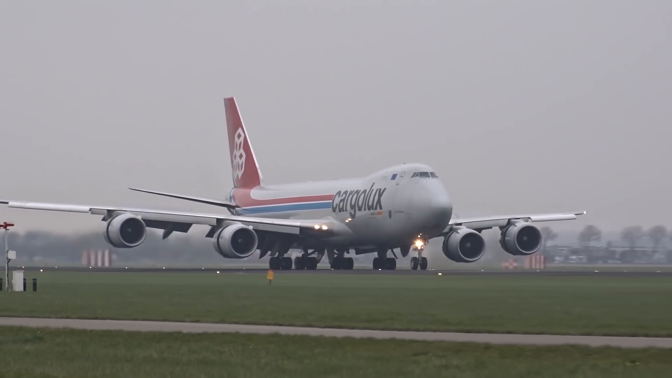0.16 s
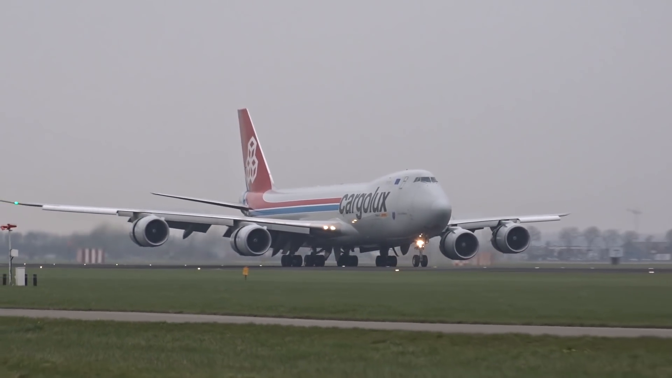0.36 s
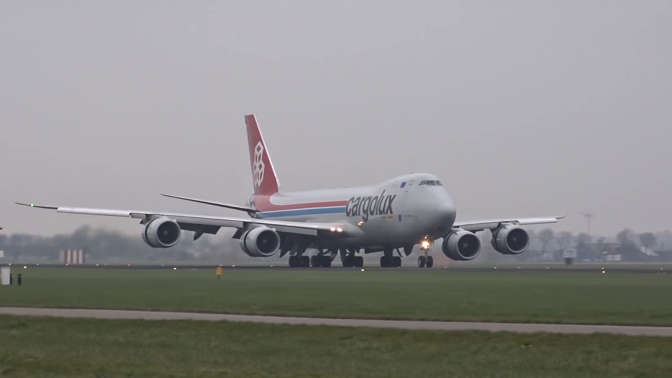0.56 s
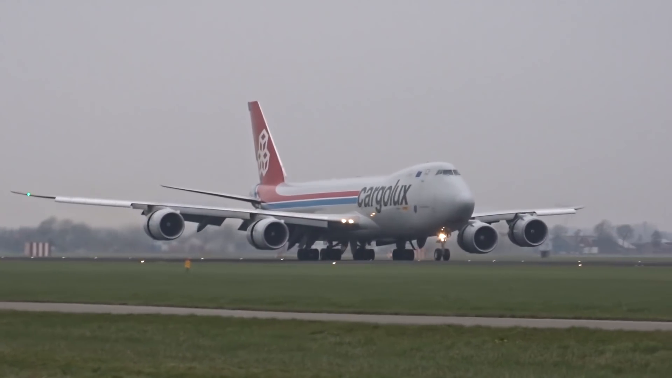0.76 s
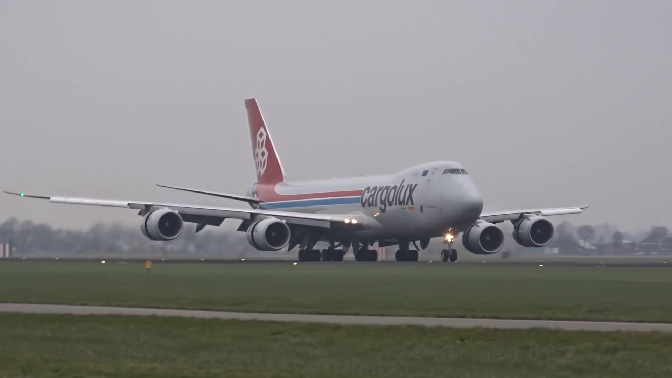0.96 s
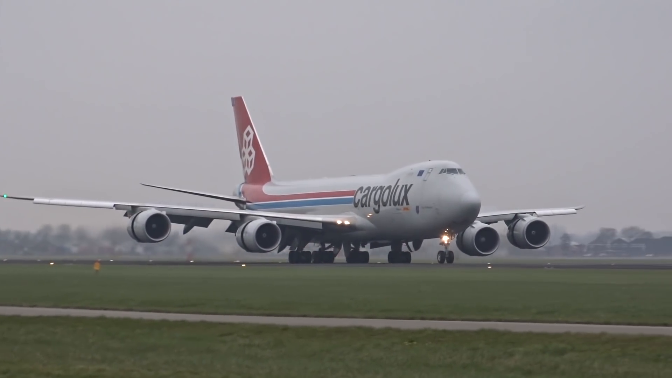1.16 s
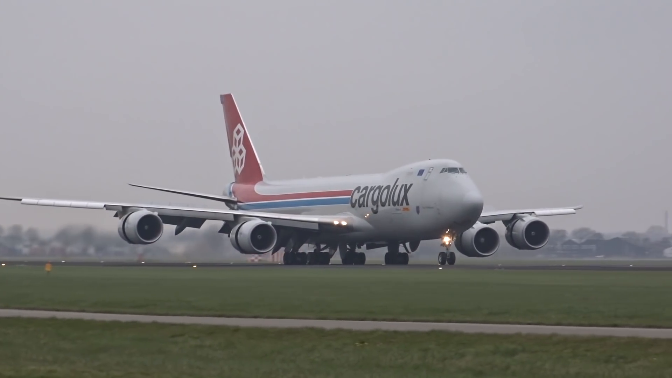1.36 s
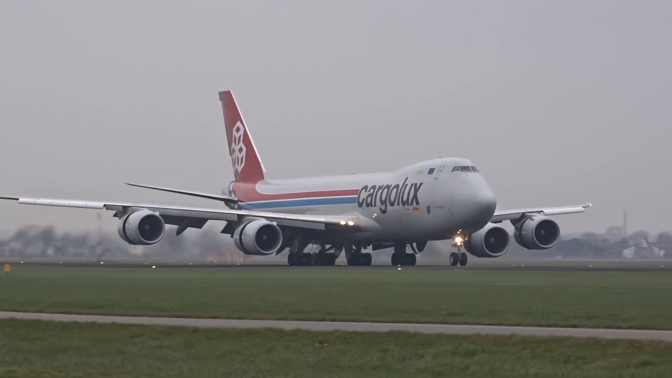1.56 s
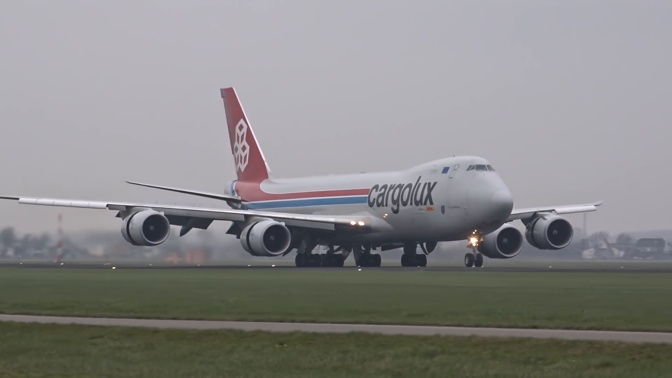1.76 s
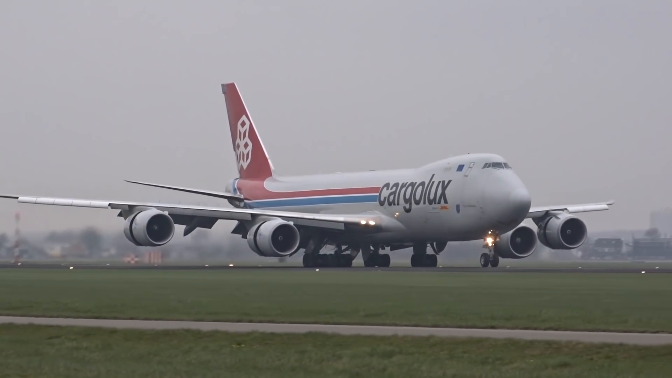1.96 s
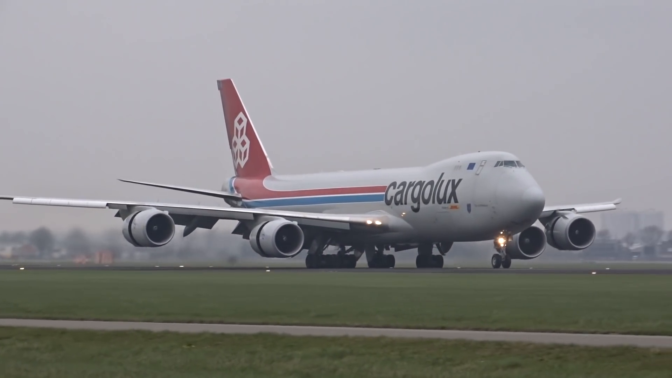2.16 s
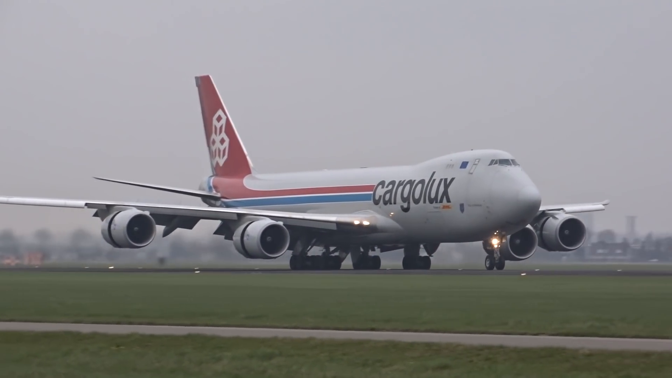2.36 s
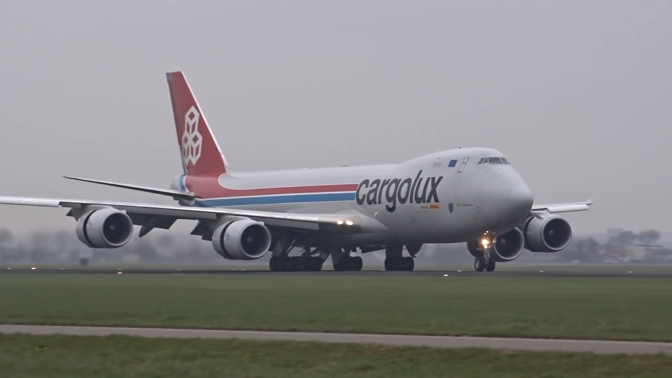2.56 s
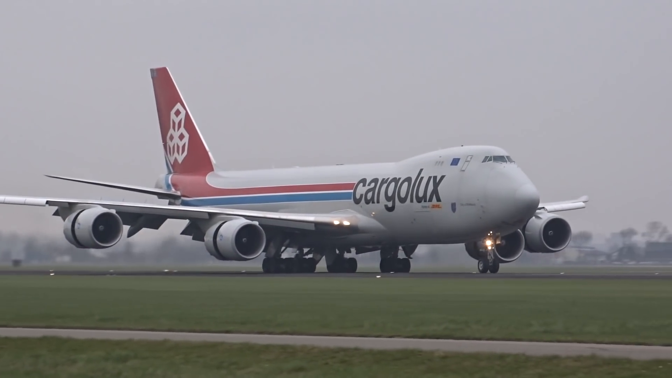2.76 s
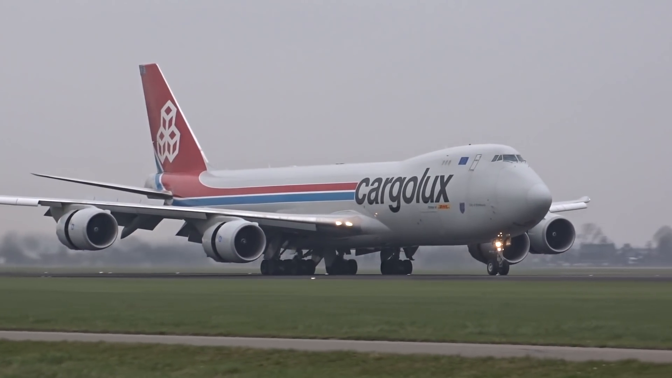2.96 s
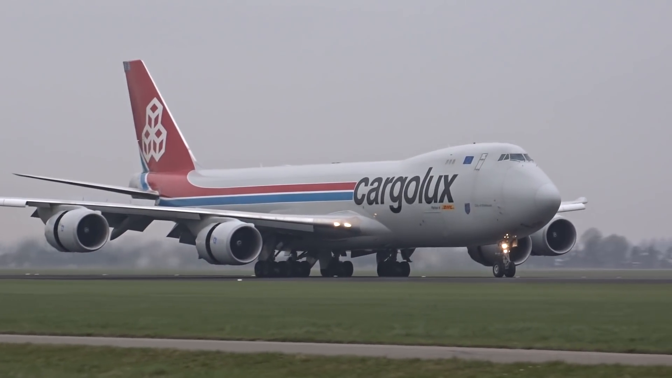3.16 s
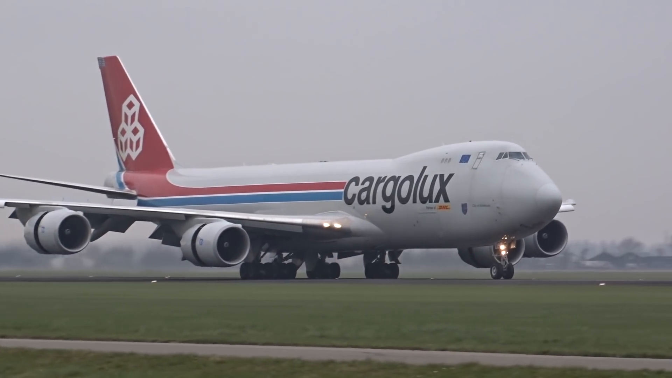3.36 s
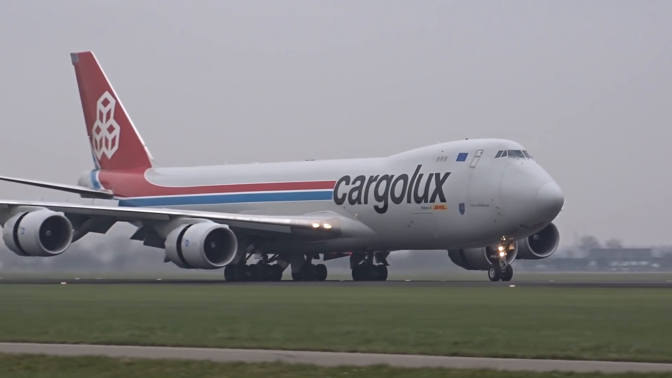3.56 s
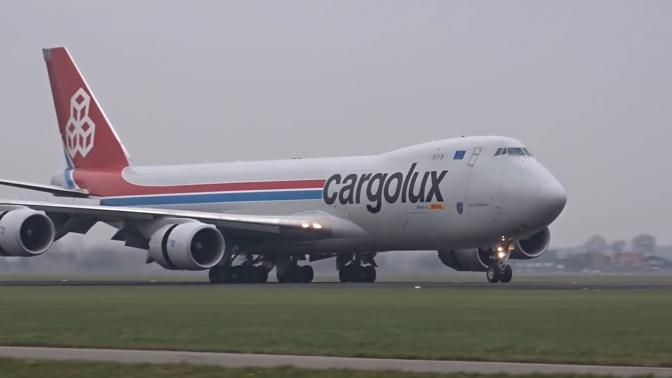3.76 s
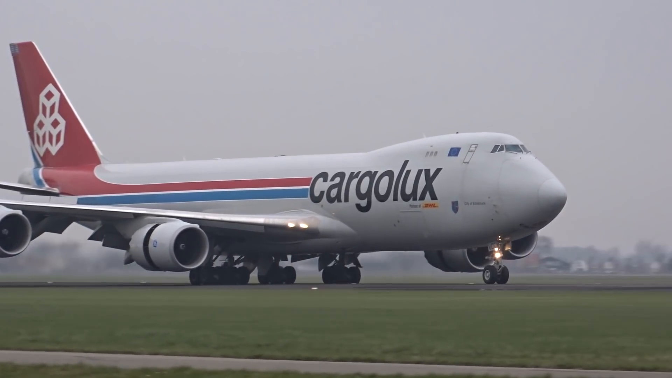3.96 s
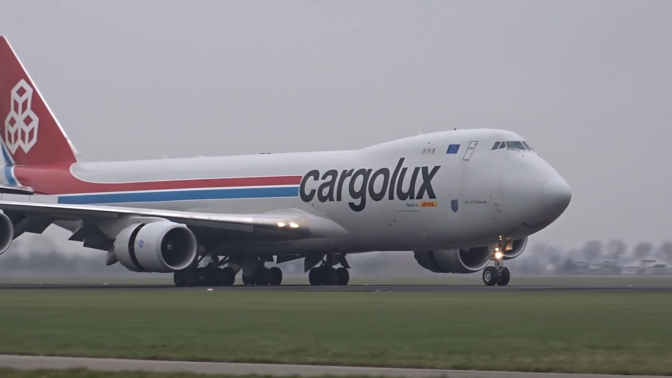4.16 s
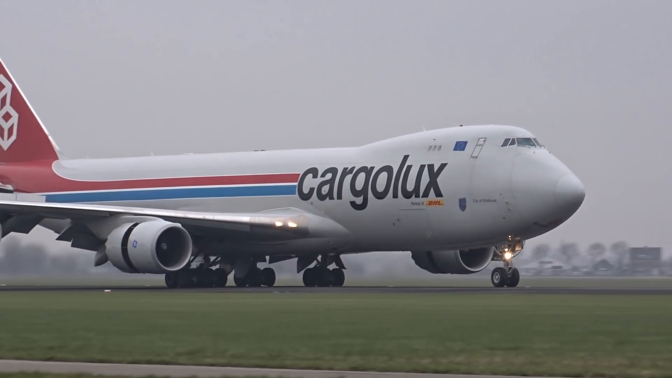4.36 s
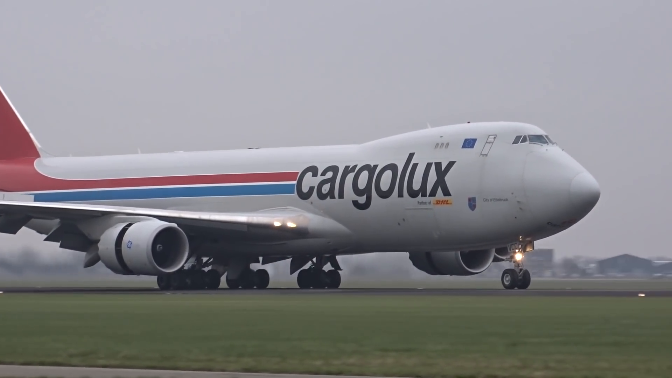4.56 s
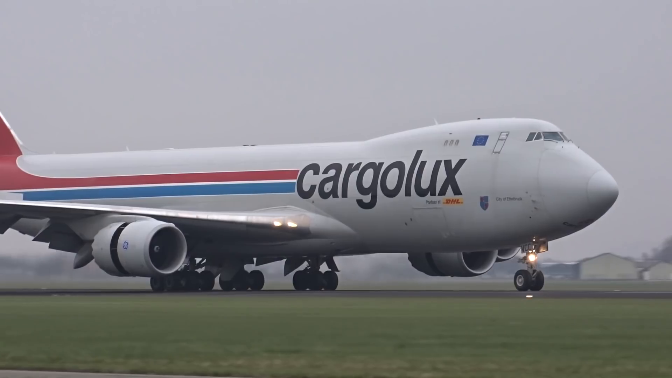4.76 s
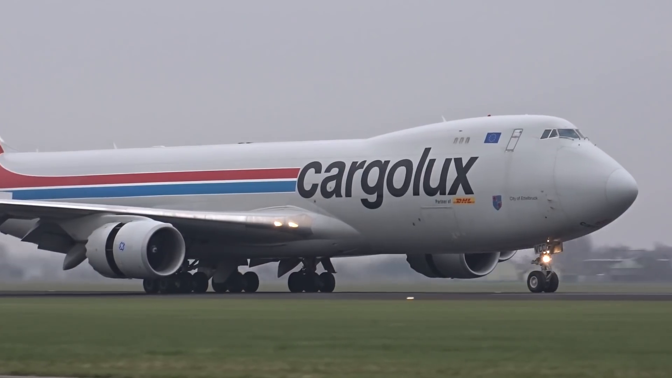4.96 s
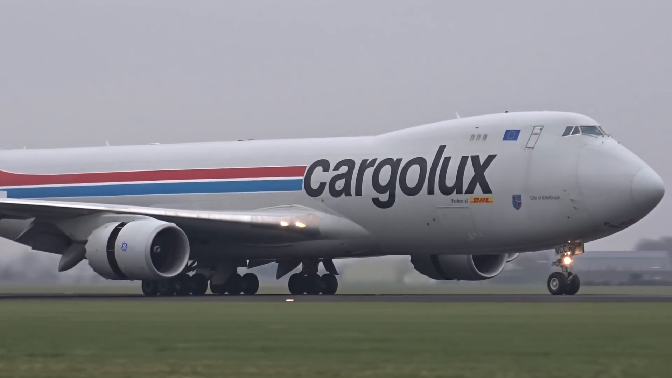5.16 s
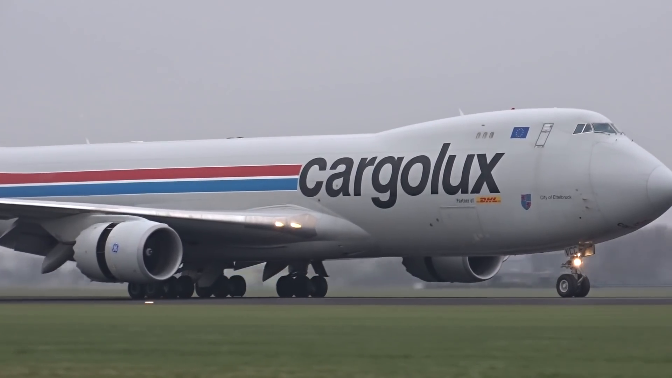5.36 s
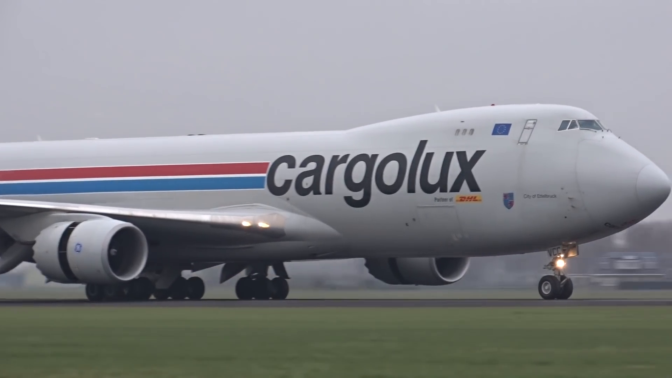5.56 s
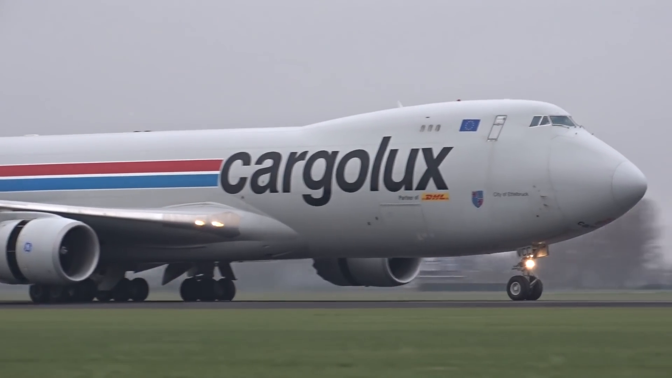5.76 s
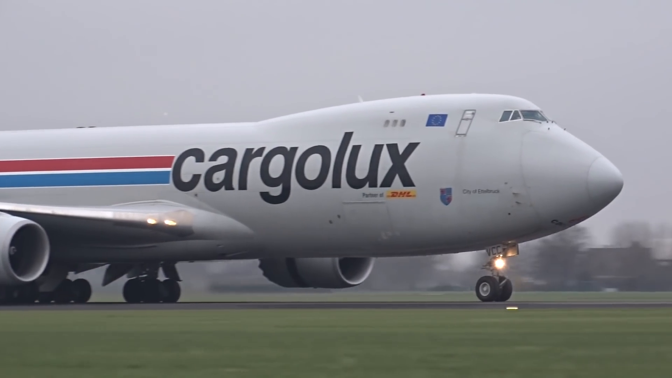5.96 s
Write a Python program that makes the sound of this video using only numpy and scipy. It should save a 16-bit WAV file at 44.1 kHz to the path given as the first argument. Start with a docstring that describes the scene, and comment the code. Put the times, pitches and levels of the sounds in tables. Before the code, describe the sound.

Jet engines rumble on a runway, build to a loud reverse-thrust roar with a faint fan tone, and hold as the airliner passes.

```python
"""A grass field beside a runway, a camera's stereo microphone, a four-engine jet some 450 m up the strip.
At first the zoom motor whirs faintly by the microphone and the housing ticks. The jet rolls closer,
braking, and opens its thrust reversers: the rumble rises, then the roar swells around a thin fan tone.
The ground lifts the rumble and hollows the low mids; the roar brightens as less air lies between.
The housing ticks once more, and the fan tone fades as the aircraft turns side-on."""
import sys
import numpy as np
from scipy import signal
from scipy.io import wavfile
from scipy.ndimage import uniform_filter1d, minimum_filter1d

SR = 44100
rng = np.random.default_rng(int(sys.argv[2]) if len(sys.argv) > 2 else 0)


def master(y):
    """Save y as 16-bit WAV."""
    cut = np.clip(np.atleast_2d(y).T, -1, 1)
    pcm = np.round(cut * 32767)  # scale
    wavfile.write(sys.argv[1], SR, pcm.astype(np.int16))


N = 265041
FRAME, HOP = 2048, 512
# noise is shaped on a grid of pitch (rows) and time (columns)
HZ, T = np.fft.rfftfreq(FRAME, 1 / SR)[:, None], np.arange(N // HOP + 5) * HOP / SR

# the fans spool up, hold, and seem to sag as the aircraft turns side-on: time_s, pitch_hz
FAN_SPOOL = [(0, 438.7), (.7, 473), (1.1, 596), (1.55, 696), (1.9, 761), (2.25, 813), (2.6, 836),
             (3.4, 847), (4.3, 825), (6.01, 813)]


def roar(gust_db=1.1, patch_db=0.26, side_on_s=4.35):
    """Spectrum in dB of the reversed jets, dulled by the air and shaken by its eddies."""
    # roar at the nearest point: pitch_hz, relative_db
    colour = [(150, -27.5), (260, -4), (286, -9.5), (370, -7), (544, -5.5), (598, -5.5), (825, -4),
              (879, -4.5), (1450, -4), (3170, -6), (3610, -10), (6320, -19), (8430, -32.5), (12000, -70),
              (15600, -89), (22000, -120)]
    # duct resonances: pitch_hz, width_hz, height_db, db_per_fan_speed_db, side_on_loss_db
    ducts = [(815, 300, 3.6, .0, 2.5), (1900, 197, 3, 1.0, .5)]
    # brief swells, most in the treble: centre_s, treble_gain_db, half_length_s
    surges = [(2.684, 0.5, 0.056), (2.978, 0.5, .08), (4.14, 3.5, 0.052), (4.679, 4, 0.028),
              (5.137, 1, 0.043), (5.777, 2.5, 0.049)]
    air_loss_db = 0.0732 * air_path(T) * (HZ / 6000) ** 1.8  # 0.0732 dB a metre at 6 kHz
    db = engine_level(T, full_db=-26.5, per_speed=3.6, per_100m=-0.65) + shape(colour, HZ, 450, 1180)
    db = db - air_loss_db
    side_on = np.clip((T - side_on_s) / 0.5, 0, 1)  # the intakes stop facing the microphone
    for hz, width, height_db, per_speed, loss_db in ducts:
        db = db + (height_db + per_speed * fan_speed_db(T) - loss_db * side_on) * bell(HZ, hz, width)
    surge_db = sum(gain_db * bell(T, centre, half) for centre, gain_db, half in surges)
    # eddies along the path make short waves flicker most, in broad bands and in patches
    flicker_db = gust_db * blotches(bins=240, frames=2) + patch_db * blotches(bins=24, frames=4)
    treble_weight = np.clip(HZ / 5000, 0, 1) ** 0.33
    return db + treble_weight * (surge_db + flicker_db)


def rumble(early_s=0.43):
    """Spectrum in dB of the deep exhaust rumble, which rises ahead of the fans."""
    # exhaust rumble, lifted by the ground: pitch_hz, relative_db
    colour = [(5, -50), (16, -8), (30, -1), (50, 1), (80, 25.5), (110, -5.5), (160, -14), (300, -58.5),
              (600, -120)]
    return engine_level(T + early_s, full_db=-30, per_speed=2.0, per_100m=-0.9) + shape(colour, HZ)


def drone():
    """Spectrum in dB of the engines' low drone, which grows as they near the microphone."""
    # engine drone: pitch_hz, relative_db
    colour = [(30, -80.5), (60, -6.5), (95, -8), (125, 0.5), (155, -0.5), (190, -3.5), (235, -10),
              (280, -23.5), (400, -22), (550, -73.5), (1000, -120)]
    return engine_level(T, full_db=-12.5, per_speed=1.92, per_100m=3.0) + shape(colour, HZ)


def fans(level_db=-35.5, start_s=0.93, stop_s=5.8, waver_db=2.0, waver_hz=2.83):
    """The thin tone of the fans, which the air makes waver in level and pitch."""
    t = np.arange(N) / SR
    hz = fan_hz(t)
    eddies = uniform_filter1d(rng.standard_normal((len(T), 2)), size=9, axis=0).T
    swell, bend = (np.interp(t, T, unit_rms(eddy)) for eddy in eddies)
    phase = 2 * np.pi * np.cumsum(hz + waver_hz * bend) / SR
    lead, _ = microphone_ports(hz, t)
    fade = np.clip((t - start_s) / 1.6, 0, 1) * np.clip((stop_s - t) / 1.9, 0, 1)
    return np.sqrt(2) * fade * amp(level_db + waver_db * swell) * np.sin([phase + lead, phase])


def zoom_motor(flutter_db=1.5):
    """A small motor beside the microphone: a banded whir and two gear whines, switched on and off."""
    # motor runs: start_s, stop_s, level_db
    runs = [(-.05, 0.543, -64), (.672, .80, -60)]
    # motor whir: pitch_hz, relative_db
    whir = [(2940, -46), (5000, -16), (5830, -18), (6060, 1), (6640, 3), (7960, -4), (8520, -12),
            (9330, -12), (9600, -1), (10100, -2), (11500, -7), (13100, -1), (14400, -4), (15100, 0),
            (15700, -4)]
    # gear whines: pitch_hz, width_hz, over_whir_db
    gears = [(3740, 110, -2), (4550, 70, -22)]
    t = np.arange(N) / SR
    gate = sum(amp(db) * (t > start) * (t < stop) for start, stop, db in runs)
    power = amp(shape(whir, HZ)) ** 2
    for hz, width, db in gears:
        whine = bell(HZ, hz, width)
        power += amp(db) ** 2 * whine / whine.mean()
    spectrum_db = 10 * np.log10(power) - flutter_db * blotches(bins=60, frames=2)
    return uniform_filter1d(gate, size=300) * stereo_noise(spectrum_db, coherence=0.98)


def housing_ticks(ring_hz=4550, t60_s=0.02):
    """The camera's plastic housing rings briefly, each time with a broad crack."""
    # ticks: start_s, gain_db, left_over_right_db, ring_share
    ticks = [(.325, -36, 2, .15), (.678, -31, 6, 0.5), (.706, -39, 0, .05), (3.912, -45, 6, 0.57)]
    out, t = np.zeros((2, N)), np.arange(2000) / SR
    crack_band = signal.butter(1, [3000, 6500], "band", fs=SR)
    cracks = signal.lfilter(*crack_band, rng.standard_normal((len(ticks), len(t))))
    ring = np.sin(2 * np.pi * ring_hz * t)
    envelope = np.minimum(t / 0.0018, 1) * amp(-60 * t / t60_s)
    for (start, db, left_db, share), crack in zip(ticks, cracks):
        at = round(start * SR)
        gains = amp([[db + left_db / 2], [db - left_db / 2]])
        out[:, at:at + len(t)] += gains * envelope * (share * ring + (1 - share) * crack)
    return out


def airfield(level_db=-39.5):
    """Spectrum in dB of the steady drone of the airfield."""
    # background drone: pitch_hz, relative_db
    colour = [(150, -27), (250, -1), (349, -10), (437, 0), (548, -7), (1200, -8.5), (1430, -27),
              (2770, -13), (4850, -37), (6000, -44.5), (7800, -75), (13200, -120)]
    return level_db + shape(colour, HZ)


def microphone_ports(hz, t, swing_s=2.56, turn_s=4.4, turn_db_per_s=0.6):
    """Phase lead in radians and balance in dB of the left port as the aircraft swings past."""
    # phase lead of the left port, before the swing scales it: pitch_hz, lead_rad
    leads = [(25, 0.12), (65, 0.32), (160, 0.65), (300, 0.87), (500, 1.07), (900, 0.66), (1800, .52),
             (3200, 0.28), (4800, 0.22), (5700, 0), (15000, 0.057)]
    # balance of the ports: pitch_hz, left_over_right_db
    balance = [(60, -1), (170, 0.5), (450, 0), (800, 1.1), (1600, -1.4), (3200, 1.2), (5000, 1), (5800, 0),
               (15000, 0.5)]
    swing = 0.12 + 1.04 * np.clip(t / swing_s, 0, 1) ** 1.6
    bass_weight = 1 / (1 + (hz / 500) ** 3.5)
    turn_db = turn_db_per_s * np.maximum(t - turn_s, 0)  # late on, the treble moves left
    return at_pitch(leads, hz) * swing ** bass_weight, at_pitch(balance, hz) + turn_db * (hz > 600) * (hz < 5600)


def engine_level(t, full_db, per_speed, per_100m):
    """Level in dB: full_db at the nearest point, with slopes per dB of fan speed and 100 m of approach."""
    return full_db + per_speed * fan_speed_db(t) - per_100m * air_path(t) / 100


def air_path(t, far_m=448.5, closing_m_per_s=115.3, braking_m_per_s2=13.76):
    """Metres of air to the braking aircraft, beyond those at its nearest point."""
    return np.maximum(far_m - closing_m_per_s * t + braking_m_per_s2 * t ** 2 / 2, 0)


def fan_hz(t):
    """Pitch of the fan tone at the times t."""
    return np.interp(t, *np.transpose(FAN_SPOOL))


def fan_speed_db(t, full_hz=840):
    """Fan speed in dB relative to full speed."""
    return 20 * np.log10(fan_hz(t) / full_hz)


def stereo_noise(db, coherence=1., lead=0., left_db=0.):
    """Noise with level db over pitch and time, as two nearby microphone ports hear it."""
    a, b, c, d = rng.standard_normal((len(T), len(HZ), 4)).T
    common, separate = a + 1j * b, c + 1j * d
    left = common * np.exp(1j * lead) * amp(db + left_db / 2)
    right = (coherence * common + np.sqrt(1 - coherence ** 2) * separate) * amp(db - left_db / 2)
    white, left, right = signal.istft([common, left, right], nperseg=FRAME, noverlap=FRAME - HOP)[1]
    return np.array([left, right])[:, :N] / white[FRAME:N].std()


def blotches(bins, frames):
    """Random field over pitch and time, smooth over so many bins and frames."""
    field = rng.standard_normal((len(T), len(HZ))).T
    for _ in range(2):
        field = uniform_filter1d(uniform_filter1d(field, bins, 0), frames, 1)
    return unit_rms(field)


def shape(points, hz, low_hz=0, high_hz=SR):
    """Spectrum in dB, shifted so that the given band has rms 1."""
    db = at_pitch(points, hz)
    power = amp(db) ** 2 * (hz >= low_hz) * (hz <= high_hz)
    return db - 10 * np.log10(power.mean(0))


def at_pitch(points, hz):
    """A table read along a logarithmic pitch axis."""
    pitches, values = np.transpose(points)
    return np.interp(np.log(hz + 1), np.log(pitches + 1), values)


def bell(x, centre, width):
    """Gaussian hump of height 1."""
    return np.exp(-.5 * ((x - centre) / width) ** 2)


def unit_rms(x):
    """Scaled to rms 1."""
    return x / np.sqrt(np.mean(x ** 2) + 1e-20)


def amp(db):
    """Decibels to gain."""
    return 10 ** (np.asarray(db) / 20)


def scene():
    """The distant jet and airfield, with the camera's own noises right at the microphone."""
    # likeness of the two ports: pitch_hz, coherence
    likeness = [(60, .992), (170, .995), (450, .989), (1800, .979), (5200, .973), (5800, .9998),
                (15000, .9999)]
    power = sum(amp(db) ** 2 for db in (roar(), rumble(), drone(), airfield()))
    outdoors = stereo_noise(10 * np.log10(power), at_pitch(likeness, HZ), *microphone_ports(HZ, T))
    return outdoors + fans() + zoom_motor() + housing_ticks()


def record(dry, knee_db=-11.0, squeeze=0.57, recover_db_per_s=250, cutoff_hz=15800):
    """The camera's fast limiter dips at the crests of the rumble; faint hiss and a low-pass follow."""
    # treble hiss: pitch_hz, relative_db
    hiss_colour = [(4000, -40), (6000, -12), (7500, -11.5), (8600, -11), (10000, -3.5), (12000, -3),
                   (15700, -0.5)]
    peak_db = 20 * np.log10(-minimum_filter1d(-abs(dry).max(0), size=200) + 1e-9)
    recovery_db = np.arange(N) * recover_db_per_s / SR
    held_db = np.maximum.accumulate(peak_db + recovery_db) - recovery_db
    window = signal.windows.blackmanharris(301)
    over_db = signal.oaconvolve(np.maximum(held_db - knee_db, 0), window / window.sum(), "same")
    limited = dry / amp(squeeze * over_db)
    hiss_db = -78 - 2.5 * np.maximum(T - 3.0, 0) + shape(hiss_colour, HZ, 13100, 15600)  # fades from 3 s
    hiss = stereo_noise(hiss_db + 3.7 * blotches(bins=12, frames=2))
    low_pass = signal.firwin(1023, cutoff_hz, window=("kaiser", 10), fs=SR)
    return signal.oaconvolve(limited + hiss, low_pass[None], "same")


dry = scene()
out = record(dry)
master(out)
```